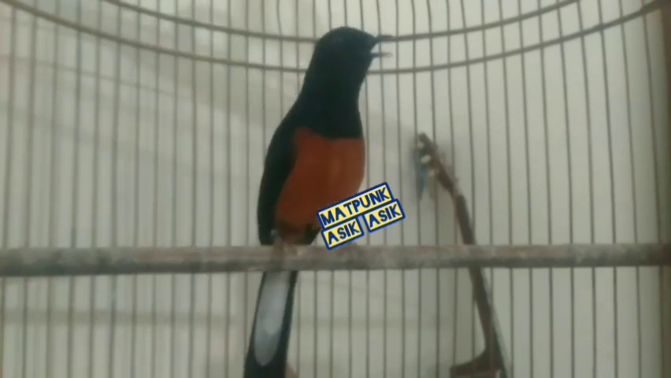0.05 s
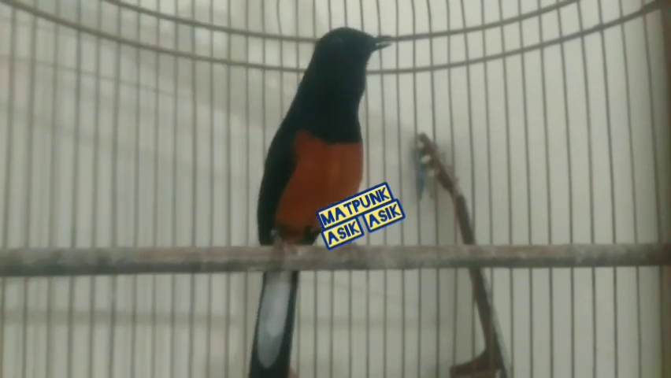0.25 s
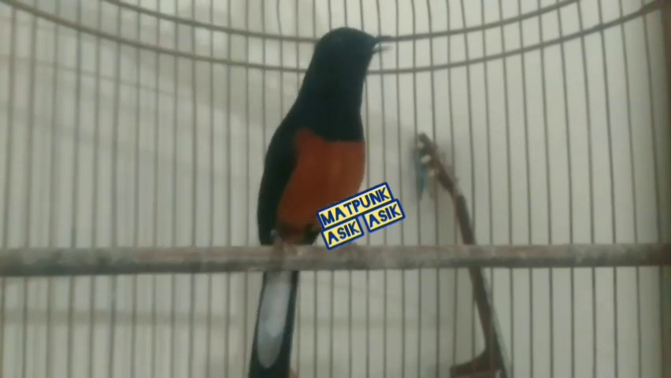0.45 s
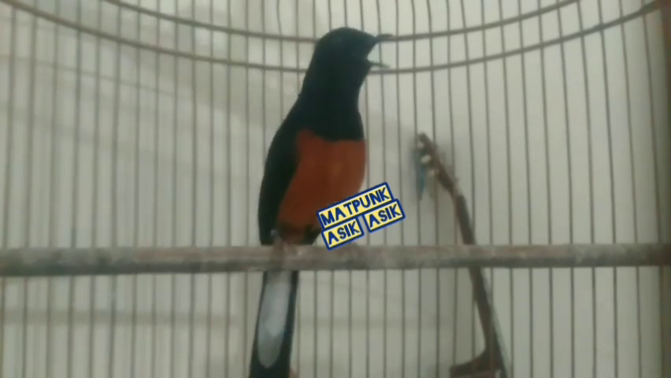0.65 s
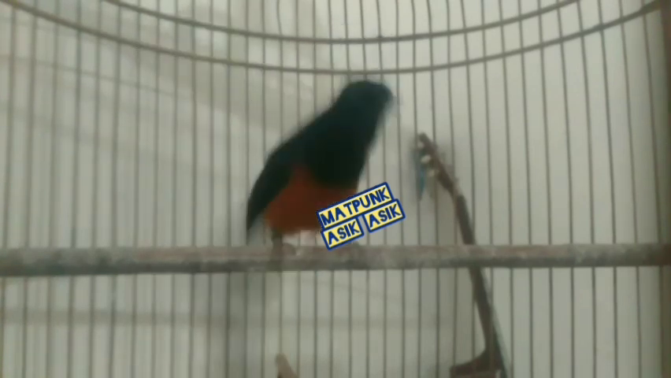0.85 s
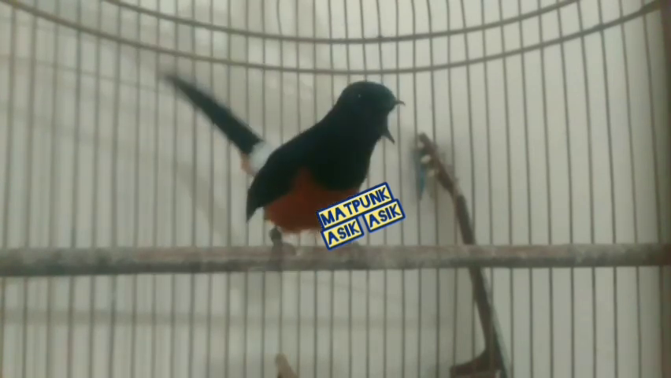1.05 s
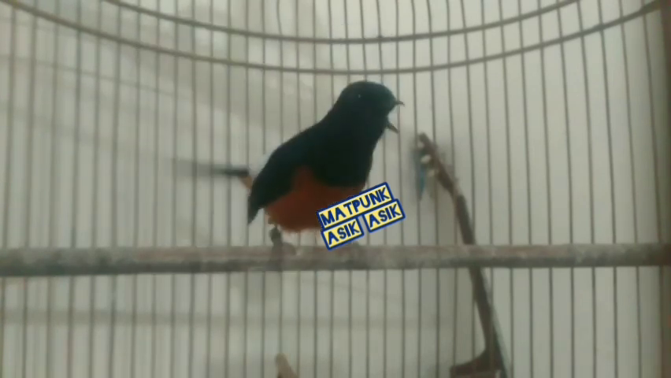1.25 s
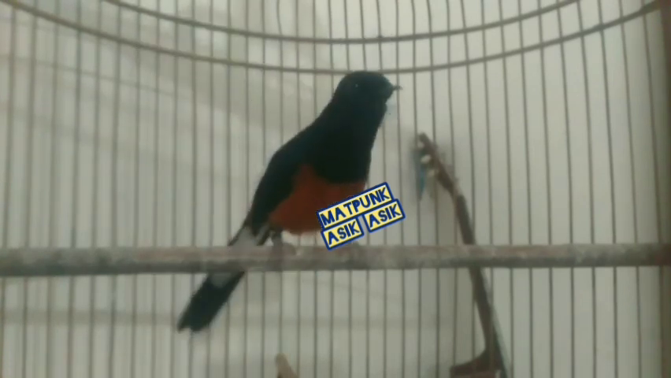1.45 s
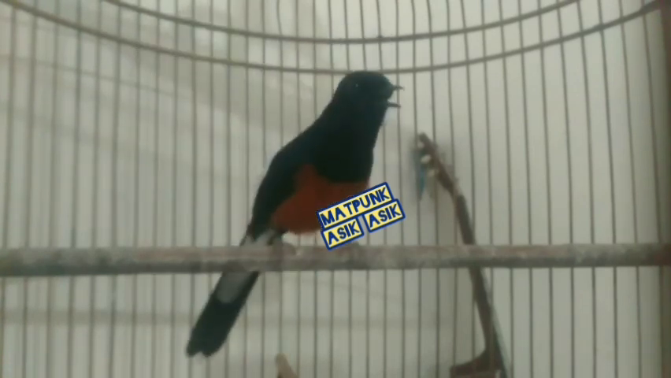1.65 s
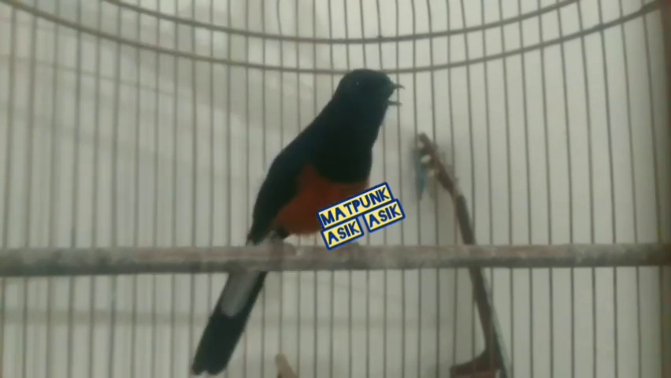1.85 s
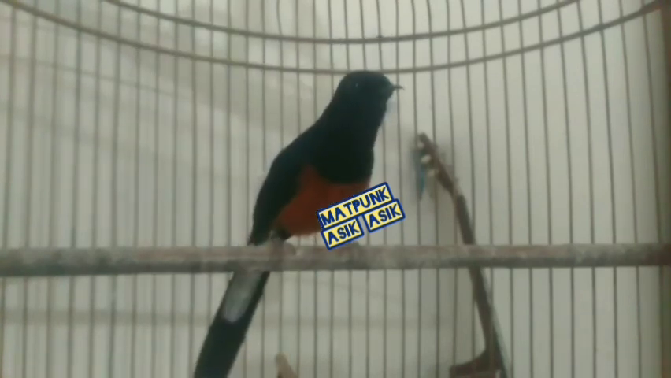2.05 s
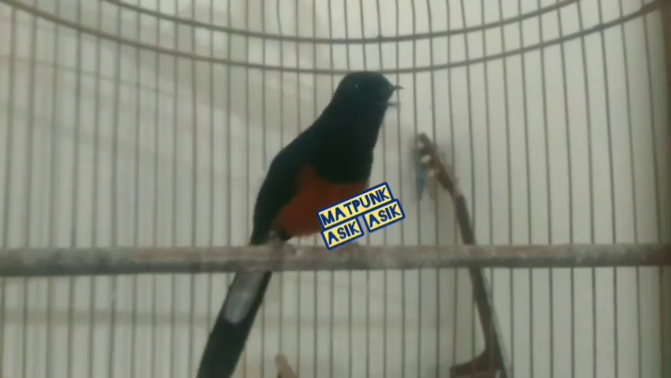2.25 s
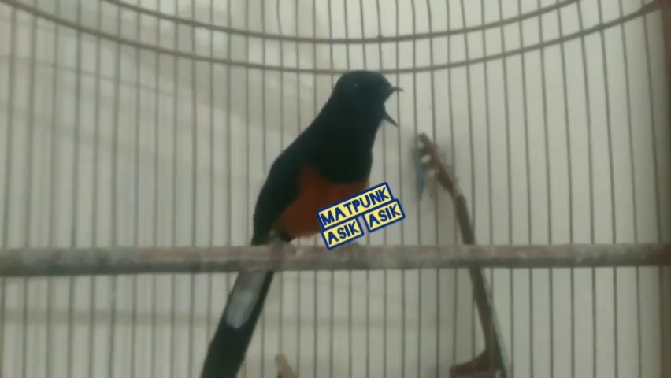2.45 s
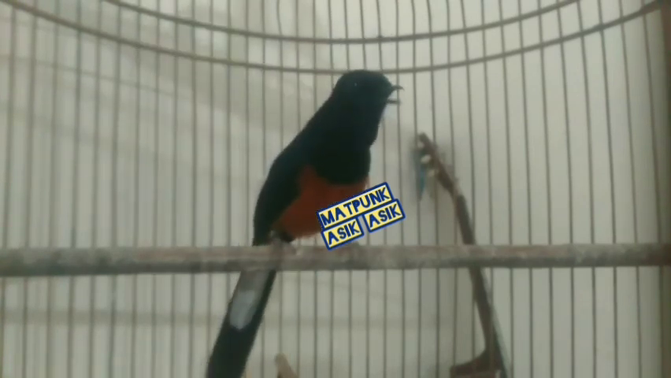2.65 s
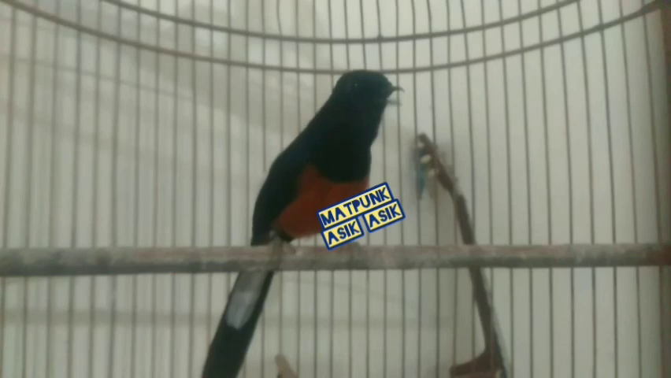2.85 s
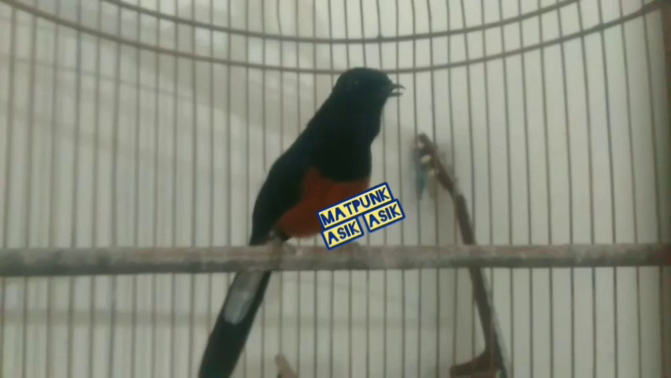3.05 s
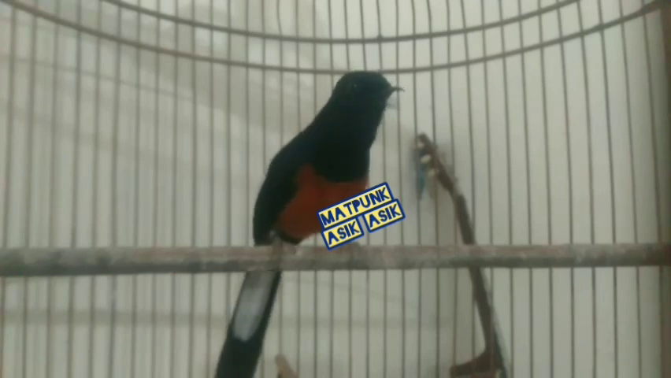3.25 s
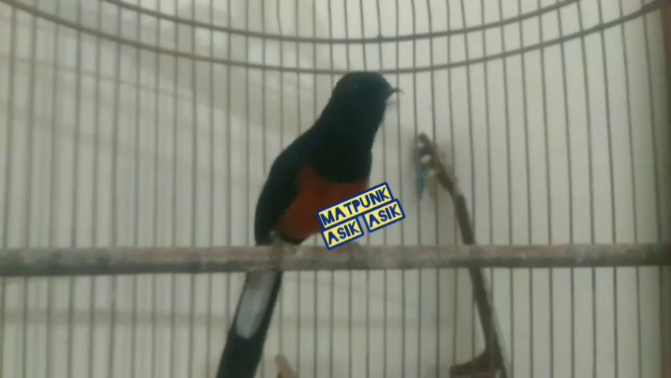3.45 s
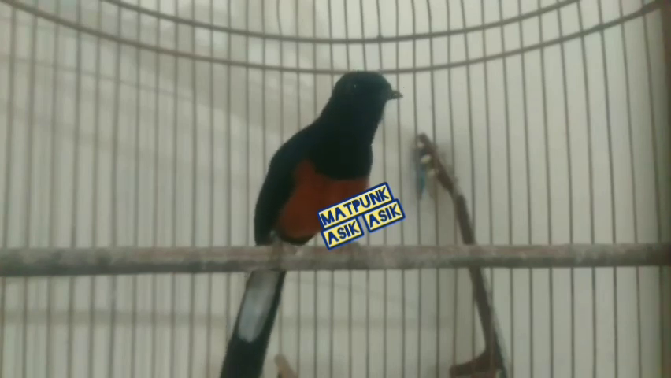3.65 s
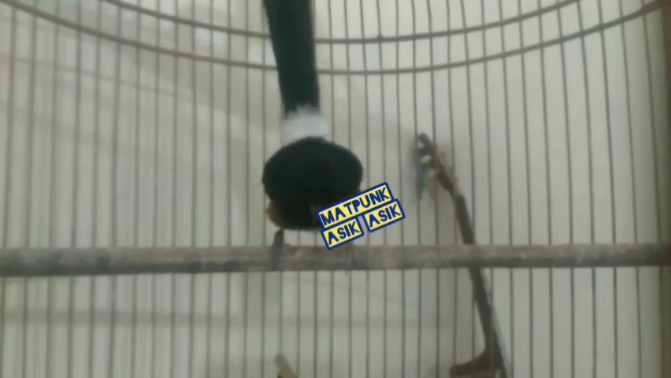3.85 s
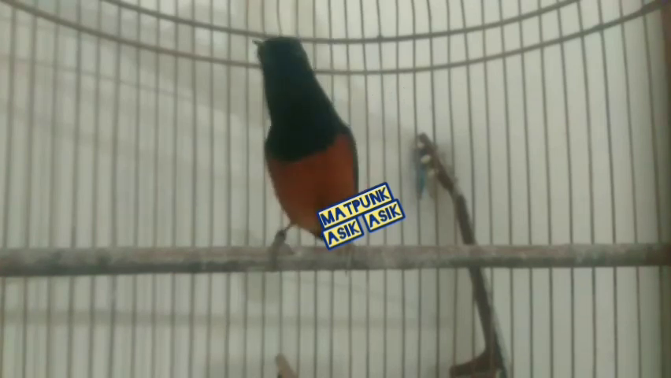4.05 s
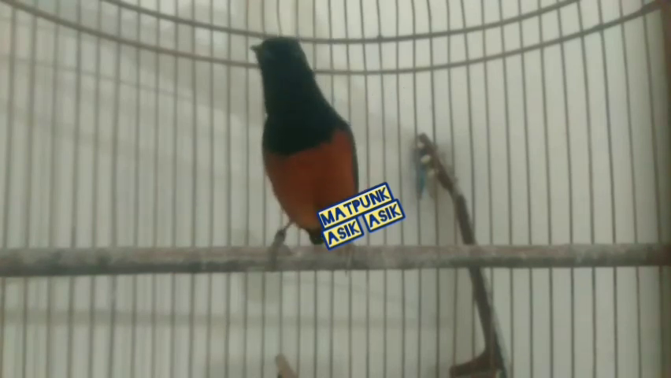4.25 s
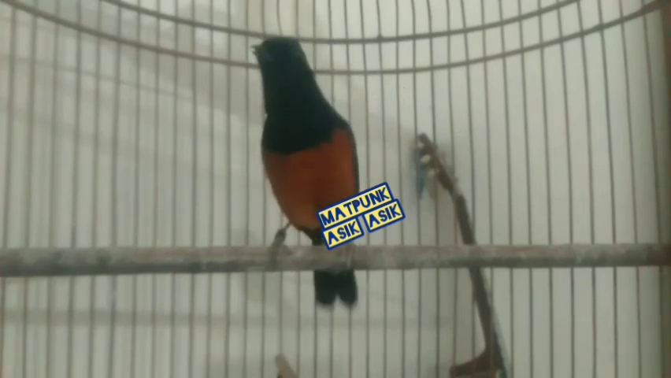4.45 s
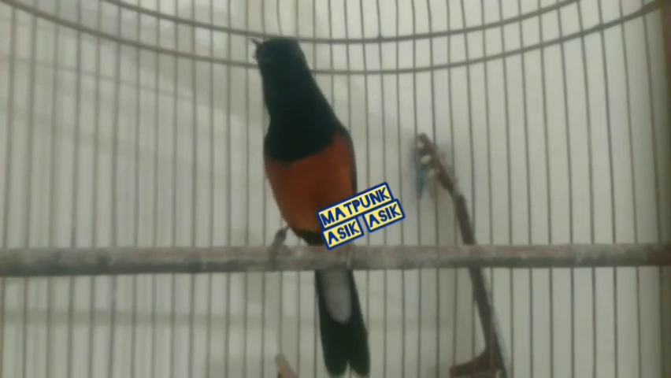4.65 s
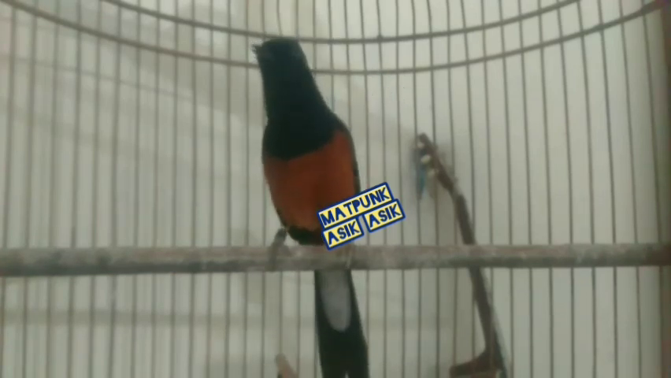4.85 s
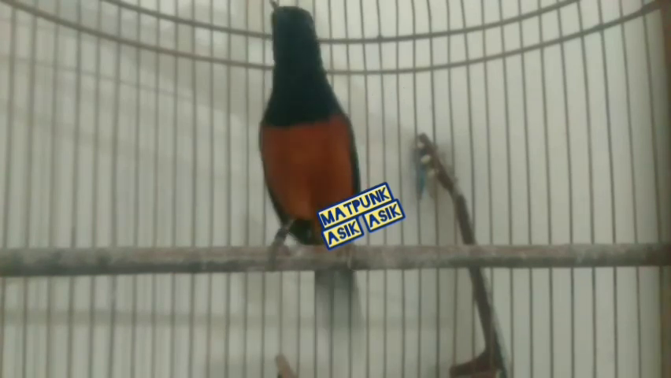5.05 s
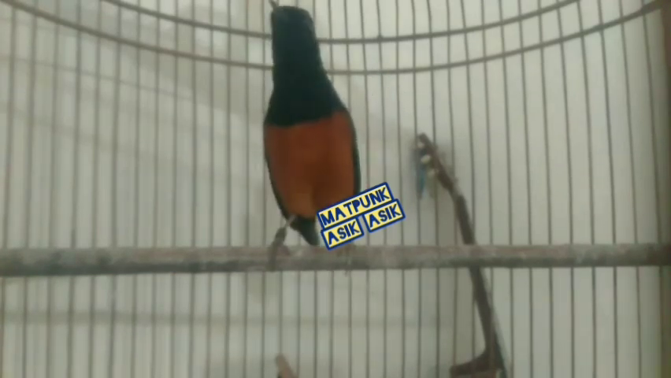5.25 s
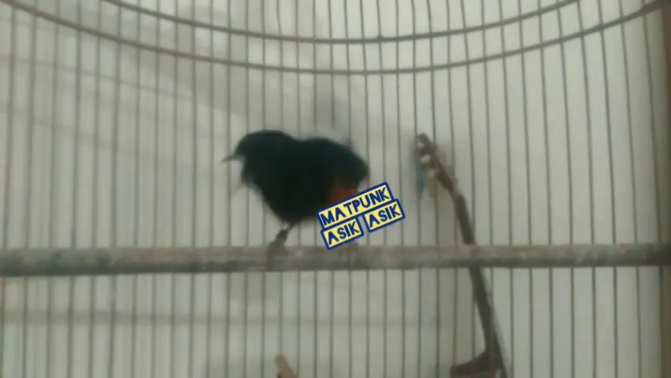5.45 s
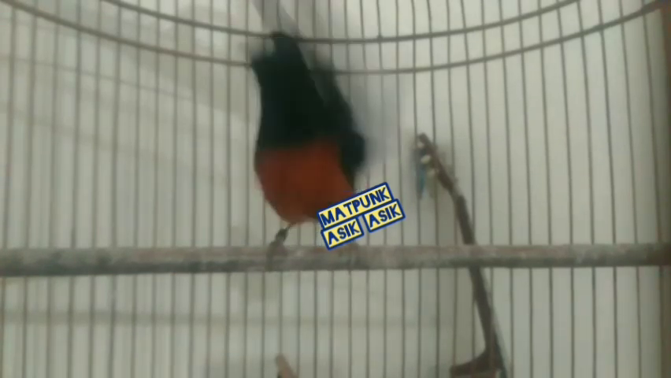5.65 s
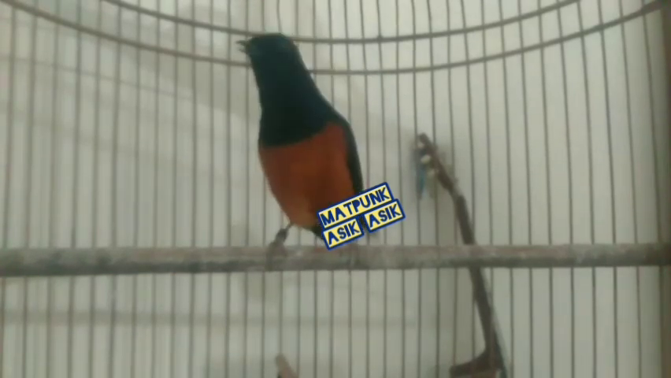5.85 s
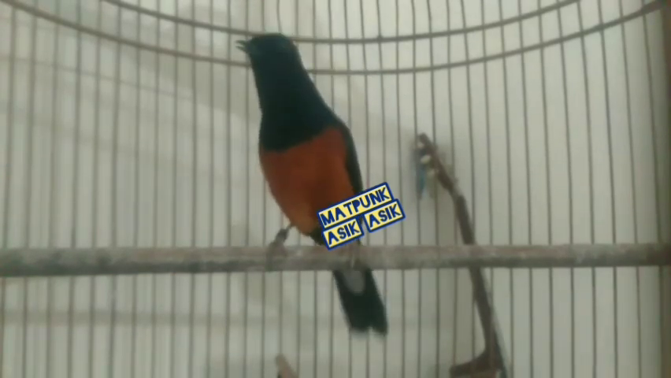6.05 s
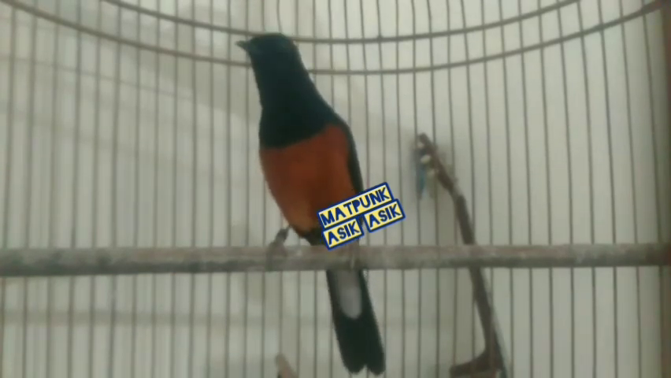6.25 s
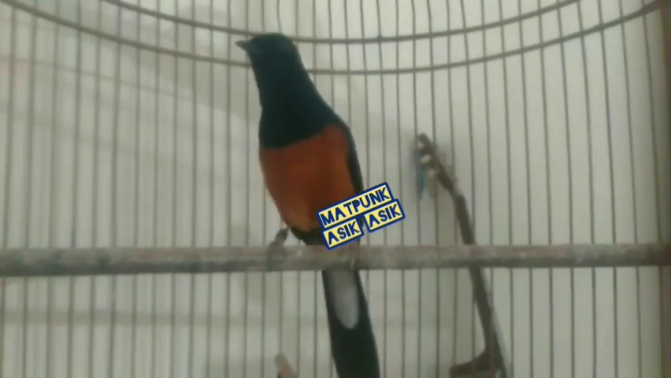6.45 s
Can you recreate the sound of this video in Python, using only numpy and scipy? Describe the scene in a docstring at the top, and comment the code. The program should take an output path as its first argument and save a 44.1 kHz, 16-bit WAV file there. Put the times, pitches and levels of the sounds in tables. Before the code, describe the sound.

A caged songbird sings close to the microphone in a small, hard, echoing room. From 0 to 0.75 s it gives quick clear whistles, one ending in a trembling warble. At about 0.8 and 1.3 s low notes creep up and break sharply higher, with whistles and buzzy warbles between. From 1.7 to 2.9 s come loud, rapid falling notes, many with shaken tails and tiny dull clicks. Around 3 to 3.45 s the notes are lower, hoarser and chattering. A pause follows, with soft wing flutters and a tap near 3.75 s. A brief run of calls comes at 4 s, then a rising, cracking call with a rough warble at 4.6 to 4.8 s. One sharp bill snap sounds at 5.5 s, followed by rustles and a mellow low whistle at 5.9 s. Distant birds whistle faintly over low, uneven outdoor rumble until about 6.6 s.

```python
"""A caged shama sings a fast run of whistles, sweeps and warbles close by in a small hard room.
It hops round on its perch, calls twice, snaps its bill and calls again; its voice is sine waves
with weak overtones, its movements are short bursts of coloured noise.
Other birds whistle faintly farther off, as thin wavering sines, over an outdoor rumble of low noise.
Echoes and a fading tail make the room; a limiter holds the loudest notes."""
import sys
import numpy as np
from scipy import signal
from scipy.fft import rfft, irfft
from scipy.io import wavfile
from scipy.ndimage import uniform_filter1d

SR = 44100
rng = np.random.default_rng(int(sys.argv[2]) if len(sys.argv) > 2 else 0)


def generate_wav(sig):
    """Save sig (samples, or channels by samples) to the path in sys.argv[1] as 16-bit PCM at SR."""
    pcm = np.round(np.clip(np.atleast_2d(sig).T, -1, 1) * 32767).astype(np.int16)
    wavfile.write(sys.argv[1], SR, pcm)


N = 287532
TIME = np.arange(N) / SR
EDGE_HZ = 15650  # the top of the sound: the final low-pass cuts here


def gain_of(db):
    """Turns decibels into a factor for the wave."""
    return 10 ** (np.asarray(db) / 20)


def evened(x):
    """Scales a signal to an rms (average strength) of 1."""
    return x / np.sqrt(np.mean(x ** 2) + 1e-20)


def read(points, hz):
    """Reads a table between its points, on a log-frequency axis as the ear hears pitch."""
    f, value = np.transpose(points)
    return np.interp(np.log(hz + 1), np.log(f + 1), value)


def add(mix, s, sound):
    """Mixes a sound in at time s, in seconds."""
    part = mix[max(round(s * SR), 0):][:len(sound)]
    part += sound[:len(part)]


def noise(colour):
    """Steady noise of rms 1: every frequency is present, as strongly as the colour table says."""
    spectrum = rfft(rng.standard_normal(N))
    hz = np.fft.rfftfreq(N, 1 / SR)
    return evened(irfft(spectrum * gain_of(read(colour, hz)), N))


def drift(rate_hz):
    """A random wander of rms 1: noise that keeps little above rate_hz."""
    spectrum = rfft(rng.standard_normal(N))
    hz = np.fft.rfftfreq(N, 1 / SR)
    return evened(irfft(spectrum / (1 + (hz / rate_hz) ** 4), N))


def burst(s, db, decay, rise):
    """A loudness curve that jumps up at time s and dies away; rise and decay in seconds."""
    age = np.maximum(TIME - s, 0)
    return gain_of(db) * (1 - np.exp(-age / rise)) * np.exp(-age / decay)


def span(s, length, edge=.011):
    """The times of a note, its progress from 0 to 1 and a gate that opens and shuts softly."""
    t = np.arange(max(s - edge / 2, 0), s + length + edge / 2, 1 / SR)
    nearest_end = np.minimum(t - t[0], t[-1] - t)
    gate = np.sin(np.pi / 2 * np.clip(nearest_end / edge, 0, 1)) ** 2
    return t, np.clip((t - s) / length, 0, 1), gate


# colours of the faint air, the deep rumble and the low drone: (f/Hz, relative level/dB)
AIR_COLOUR = [(100, -13), (250, -21.5), (400, -17), (700, -17.5), (1200, -16.5), (2400, -25), (3500, -32),
              (5000, -34), (8000, -35), (15000, -36)]
RUMBLE_COLOUR = [(12, -27.5), (22, 0.5), (50, -3.5), (80, 0.5), (100, -12.5), (130, -25.5), (200, -58)]
DRONE_COLOUR = [(70, -29), (115, -0.5), (200, 2), (260, -5.5), (330, -18), (500, -34.5), (900, -72)]
# the swells of the outdoor background, before random lumps: (t/s, rumble level/dB, drone level/dB)
OUTDOOR_LEVELS = [(0.0, -58.5, -69.5), (1.89, -61, -71.5), (3.0, -53.5, -61), (3.09, -51, -51),
                  (3.25, -56, -59), (3.65, -48, -51), (3.69, -53, -57), (3.94, -41.5, -59),
                  (4.03, -54.5, -67.5), (4.56, -57, -64.5), (4.87, -43, -54), (5.39, -55.5, -68),
                  (5.5, -45.5, -65), (5.97, -61, -69.5), (6.1, -45, -54.5), (6.52, -53.5, -58)]
AIR_DB = -64.5  # middle level of the air


def outdoors(rumble_db=0.0, drone_db=0, lumps_db=2, air_follow=0.13):
    """Low noise swells slowly and lumpily as rumble and drone; faint air swells a little with the drone."""
    s, *levels = np.transpose(OUTDOOR_LEVELS)
    deep, upper = (np.interp(TIME, s, db) + lumps_db * drift(rate_hz=2.2) for db in levels)
    rumble = gain_of(rumble_db + deep) * noise(RUMBLE_COLOUR)
    drone = gain_of(drone_db + upper) * noise(DRONE_COLOUR)
    air = gain_of(AIR_DB + air_follow * (upper - upper.mean())) * noise(AIR_COLOUR)
    return rumble + drone + air


# whistles of birds farther off: (start t/s, length t/s, first f/Hz, last f/Hz, relative peak level/dB)
FAR_WHISTLES = [ (-0.003, 0.08, 2046, 2110, -38.5), (0.319, 0.093, 2810, 2879, -40),
                (.75, .08, 2790, 2810, -33.5), (3.57, .14, 2725, 3300, -49.5),
                (3.818, 0.1, 2810, 2990, -51), (4.395, 0.038, 2365, 3074, -41.5),
                (4.432, 0.07, 2740, 3530, -53.5), (4.499, 0.11, 2046, 2062, -42.5),
                (5.18, 0.13, 1789, 1796, -49), (5.581, .1, 2177, 2050, -44),
                (5.685, 0.2, 1894, 1843, -44.5), (5.843, .055, 2626, 1930, -40.5),
                (6.161, 0.15, 2220, 2340, -43.5), (6.299, 0.31, 1935, 1988, -45)]
FAR_RISE_S, FAR_FADE_DB = 0.005, 18  # each far whistle rises, then fades by this much


def neighbours(level_db=-1, jitter=0.02):
    """Each far whistle is one thin sine gliding from pitch to pitch and wavering a little."""
    out, wobble = np.zeros(N), drift(rate_hz=16)
    for s, length, first_hz, last_hz, db in FAR_WHISTLES:
        t, u, gate = span(s, length)
        rise = np.minimum((t - t[0]) / FAR_RISE_S, 1)
        loudness = gate * rise * gain_of(db - FAR_FADE_DB * u)
        glide_hz = first_hz + (last_hz - first_hz) * u
        hz = glide_hz * (1 + jitter * np.interp(t, TIME, wobble))
        add(out, t[0], loudness * np.sin(2 * np.pi * np.cumsum(hz) / SR))
    return gain_of(level_db) * out


# wing beats and feet on the perch: (t/s, relative level/dB, rise t/s, decay t/s)
FLUTTERS = [(3.723, -41.5, 0.02, 0.021), (3.775, -29, 0.00061, 0.0068), (3.805, -34, 0.0043, 0.01),
            (3.893, -43, 0.0032, 0.017), (5.42, -49, 0.011, 0.036), (5.608, -39, 0.0035, 0.021),
            (5.738, -53, .008, 0.019), (6.275, -43, 0.011, 0.032)]
# colour of the flutter noise: (f/Hz, relative level/dB)
FLUTTER_COLOUR = [(200, -8.5), (320, -5.5), (500, 4), (800, -3.5), (1200, -13), (1800, -4), (3200, -20.5),
                  (4800, -37), (7000, -53), (15000, -37)]


def wings(grain_db=3):
    """Puffs of grainy, rustling noise from the feathers as the bird shifts and hops."""
    strokes = sum(burst(s, db, decay, rise) for s, db, rise, decay in FLUTTERS)
    grain = gain_of(grain_db * drift(rate_hz=170))
    return strokes * noise(FLUTTER_COLOUR) * grain


# colour of the bill snap: (f/Hz, relative level/dB)
SNAP_COLOUR = [(300, -43), (700, -1.5), (1000, -17), (1450, 5.5), (1900, -17), (2300, 2.5), (2900, -1),
               (3600, -9), (4500, -10), (5400, -8), (6500, -39), (8300, -26), (11000, -26.5),
               (15000, -22.5)]
SNAP_S, SNAP_DB, SNAP_DECAY_S = 5.4815, -20, 0.0046  # when the bill snaps shut, how hard, how briefly


def bill():
    """One sharp snap: a noise burst that starts almost at once and is gone within a blink."""
    return burst(SNAP_S, SNAP_DB, SNAP_DECAY_S, rise=.0001) * noise(SNAP_COLOUR)


# soft clicks that come with the notes: (t/s, relative level/dB)
CLICKS = [(.357, -39.5), (.475, -43.5), (.71, -38.5), (.868, -26), (.879, -25), (1.288, -37),
          (1.379, -32.5), (1.495, -43.5), (1.728, -33), (2.095, -39), (2.283, -37), (2.444, -32),
          (2.607, -38.5), (4.1, -29.5), (4.683, -32)]
# colour of the clicks: (f/Hz, relative level/dB)
CLICK_COLOUR = [(150, -17), (350, -7), (600, 1), (1000, -6), (2200, -3), (4000, -14.5), (7000, -23),
                (15000, -24)]
CLICK_DECAY_S = 0.00099


def clicks():
    """Short, dull ticks of noise that go with the song."""
    ticks = sum(burst(s, db, CLICK_DECAY_S, rise=0.0013) for s, db in CLICKS)
    return ticks * noise(CLICK_COLOUR)


# short hoarse notes: (start t/s, length t/s, first f/Hz, last f/Hz, relative level/dB,
# octave lift level/dB, pitch unsteadiness [share of the pitch])
RASPS = [ (3.094, 0.015, 1346, 1040, -18, 5, 0.081), (3.118, 0.033, 1002, 755, -20, 11, 0.058),
         (3.206, 0.049, 1553, 1370, -18.5, 21, 0.0033), (3.37, .035, 1326, 1032, -19, 4, 0.054),
         (4.028, 0.045, 969, 939, -19, 7, 0.033)]
RASP_FADE_DB, RASP_LIFT_DB = 15, 3.5  # fall in level over the note; lift of its overtones


def rasp(s, length, first_hz, last_hz, db, hoarse_db, unsteady):
    """A low, unsteady note with a strong octave, gliding and fading evenly."""
    t, u, gate = span(s, length)
    hz = first_hz + (last_hz - first_hz) * u
    return t, hz, gate * gain_of(db - RASP_FADE_DB * u), RASP_LIFT_DB, hoarse_db, unsteady


# shaken notes, mostly the endings of sweeps and whistles: (start t/s, length t/s, first f/Hz, last f/Hz,
# first relative level/dB, last relative level/dB, shake f/Hz, depth [share of the pitch],
# overtone lift level/dB, octave lift level/dB)
WARBLES = [ (0.215, 0.085, 1590, 1512, -11, -21, 42, 0.091, -7.5, -3),
           (0.886, 0.073, 1713, 1636, -17.5, -18.5, 54, 0.076, -3.5, -7),
           (1.014, 0.051, 2299, 2703, -13, -12, 80, 0.013, -3, 1.5),
           (1.065, .04, 2776, 2930, -16.5, -27, 94, 0.036, -8, 1),
           (1.528, 0.075, 2275, 2158, -8.5, -19.5, 82, 0.03, -2.5, -3),
           (1.742, .092, 1506, 1468, -17.5, -19.5, 39.5, 0.11, -3.5, 3.5),
           (1.949, 0.084, 1484, 1407, -22.5, -18, 46, 0.097, -2, 4.5),
           (2.142, 0.049, 2277, 2196, -13.5, -14.5, 101, 0.025, -3.5, -4),
           (2.32, 0.062, 1402, 1048, -14.5, -35.5, 46, 0.072, -4.5, -1),
           (2.683, 0.029, 1493, 1550, -21, -25.5, 69, 0.14, -9, -4),
           (3.414, .044, 2301, 2465, -18.5, -17.5, 105, 0.058, 6, 8.5),
           (4.692, 0.11, 1469, 1359, -16.5, -24, 44, 0.15, -2.5, 12.5)]
THROB = 2.2  # how strongly a warble swells at its crests
WARBLE_SCATTER = 0.00092  # pitch unsteadiness, as a share for each dB of octave lift


def warble(s, length, first_hz, last_hz, first_db, last_db, rate, depth, lift_db, hoarse_db):
    """A gliding note whose pitch shakes fast and swells at the crests; a hoarse one is also unsteady."""
    t, u, gate = span(s, length)
    shake = 1 + np.clip(depth, 0, .5) * np.sin(2 * np.pi * rate * (t - s))
    hz = (first_hz + (last_hz - first_hz) * u) * shake
    loudness = gate * gain_of(first_db + (last_db - first_db) * u) * shake ** THROB
    return t, hz, loudness, lift_db, hoarse_db, WARBLE_SCATTER * max(hoarse_db, 0)


# loud falling notes: (start t/s, length t/s, first f/Hz, last f/Hz, relative peak level/dB,
# overtone lift level/dB)
DOWNSWEEPS = [ (1.71, .031, 1991, 1565, -9, -4.5), (1.902, 0.044, 1883, 1542, -7, -4),
              (2.102, 0.038, 2592, 2241, -5.5, -3.5), (2.271, 0.044, 1772, 1579, -4, -8.5),
              (2.45, 0.1, 2360, 2113, -7.5, -4), (2.622, 0.055, 1850, 1478, -4, -6),
              (2.83, .048, 1440, 1244, -10, -7)]
ATTACK_S, ATTACK_DB, SAG_DB, FALL_POWER = .014, 13, 6.5, 1.2  # quick swell, then level and pitch sink


def downsweep(s, length, first_hz, last_hz, db, lift_db):
    """A quick swell at the start, while the pitch slides down and the level sags."""
    t, u, gate = span(s, length)
    under_db = ATTACK_DB * np.maximum(1 - (t - s) / ATTACK_S, 0) + SAG_DB * u ** 2
    hz = first_hz + (last_hz - first_hz) * u ** FALL_POWER
    return t, hz, gate * gain_of(db - under_db), lift_db, 0, 0


# low notes that creep up, break register and shoot upwards: (start t/s, length t/s, first f/Hz, last f/Hz,
# low register relative level/dB, high register relative level/dB, overtone lift level/dB,
# and after the break: octave lift level/dB, pitch unsteadiness [share of the pitch])
UPSWEEPS = [ (0.805, .075, 851, 1733, -16, -10.5, -3, -2, .007),
            (1.305, .089, 883, 1753, -14.5, -8, -4, -10, .006),
            (4.601, .09, 869, 1640, -13.5, -17, -2.5, 20.5, 0.059)]
CREEP, RUSH_POWER = .4, 4.9  # share of the climb made at an even pace; steepness of the rest
BREAK_AT, BREAK_WIDTH, BREAK_DIP_DB = 0.63, 0.046, 14.5  # place and width as shares of the note
LOW_SWELL_DB = 23  # the low register grows by this much


def upsweep(s, length, first_hz, last_hz, low_db, high_db, lift_db, hoarse_db, unsteady):
    """The pitch climbs ever faster; the voice dips at the register break and returns less steady."""
    t, u, gate = span(s, length)
    hz = first_hz + (last_hz - first_hz) * (CREEP * u + (1 - CREEP) * u ** RUSH_POWER)
    past = (u - BREAK_AT) / BREAK_WIDTH
    high = .5 + .5 * np.tanh(past)  # 0 in the low register, 1 in the high one
    swell_db = LOW_SWELL_DB * np.maximum(1 - u / BREAK_AT, 0) ** 3
    dip_db = BREAK_DIP_DB * np.exp(-past ** 2)
    db = low_db + (high_db - low_db) * high - swell_db - dip_db
    return t, hz, gate * gain_of(db), lift_db, hoarse_db * high, unsteady * high


# clean notes on one arc of pitch: (start t/s, length t/s, first f/Hz, middle f/Hz, last f/Hz,
# relative peak level/dB, place of the peak [0-1], overtone lift level/dB)
WHISTLES = [ (0, 0.074, 2605, 2966, 3134, -18.5, 0, -2.5), (.162, 0.058, 1566, 1618, 1646, -7.5, 1, -6.5),
            (0.364, 0.051, 2162, 2141, 2167, -7, 0.37, -15), (0.481, 0.12, 2370, 3023, 3074, -17, 0.09, 3),
            (0.641, .11, 2980, 3361, 3205, -21.5, 0, 5), (1.136, 0.089, 2677, 3073, 3374, -19, .35, 8),
            (1.395, 0.033, 1689, 1649, 1640, -15, 0.26, -4),
            (1.503, 0.027, 1814, 2327, 2580, -10.5, 0.91, 0.5),
            (2.475, 0.037, 2810, 2636, 2680, -29, 0.58, -3.5),
            (2.943, .053, 1338, 1396, 1321, -12.5, 0.8, -7), (3.053, .06, 1292, 1417, 1279, -17.5, 0.3, -5),
            (3.155, 0.041, 1303, 1581, 1690, -5, 0.73, -1.5),
            (3.302, .068, 1075, 1670, 1556, -10, .8, -0.5),
            (3.378, 0.047, 2004, 2080, 2510, -25.5, 0.95, -6),
            (3.95, .063, 1127, 1341, 1092, -21, 0.7, -3.5),
            (4.013, 0.019, 1400, 1450, 1500, -20, 0.3, -4.5),
            (4.058, 0.029, 1193, 1335, 1605, -14.5, 0.4, -4.5),
            (4.088, .036, 1694, 1944, 2299, -10.5, 0.13, -7.5),
            (5.899, 0.095, 1293, 1443, 1258, -14, 0.43, -9.5),
            (5.997, 0.033, 1257, 1062, 977, -27, 0.19, 3)]
SWELL_DB, FADE_DB = 15, 9.5  # about how far under its peak a whistle starts and ends


def arc(s, length, first_hz, middle_hz, last_hz, db, peak_at, lift_db, roundness=1.7):
    """A whistle: the pitch bends through three values while the level swells and fades."""
    t, u, gate = span(s, length)
    bend_hz = (2 * middle_hz - first_hz - last_hz) * 2 * u * (1 - u)
    hz = first_hz + (last_hz - first_hz) * u + bend_hz
    peak = np.clip(peak_at, .05, .95)
    before_db = SWELL_DB * np.maximum(1 - u / peak, 0) ** roundness
    after_db = FADE_DB * np.maximum((u - peak) / (1 - peak), 0) ** roundness
    return t, hz, gate * gain_of(db - before_db - after_db), lift_db, 0, 0


def song():
    """Every note as (times, pitch, loudness, overtone lift, octave lift, unsteadiness)."""
    kinds = (arc, WHISTLES), (upsweep, UPSWEEPS), (downsweep, DOWNSWEEPS), (warble, WARBLES), (rasp, RASPS)
    return [shape(*row) for shape, table in kinds for row in table]


# strength of the overtones that leave the bill, before lifts and slope: (f/Hz, level/dB)
OVERTONES = [(1700, -14), (2500, -31.5), (3200, -53), (3700, -47.5), (4500, -44.5), (5500, -57),
             (6500, -60), (7300, -63.5), (8400, -45), (9700, -53.5), (11400, -47), (13300, -50.5),
             (15300, -39)]
# colour of the noise of a cracking voice: (f/Hz, relative level/dB)
GRIT_COLOUR = [(200, -9), (500, -3), (1500, 2), (3000, 4.5), (5000, -7), (6500, -18.5), (9000, -11.5),
               (15000, -15.5)]


def shama(jitter=0.0033, shimmer_db=2.07, flicker_db=4, slope_db=-4, brightening=0.035,
          octave_share=0.15, grit_db=-4.0):
    """The voice organ gives a near sine and weak, flickering overtones; unsteady notes add noisy grit."""
    whistle, sheen = np.zeros(N), np.zeros(N)  # whistle: pitch and octave; sheen: the rest and grit
    chance = drift(rate_hz=300), drift(rate_hz=20), noise(GRIT_COLOUR)
    flickers = [drift(rate_hz=43) for _ in range(3, 13)]
    for t, hz, loudness, pressure_db, hoarse_db, unsteady in song():
        wobble, shimmer, grit = (c[round(t[0] * SR):][:len(t)] for c in chance)
        hz = hz * (1 + (jitter + unsteady) * wobble)
        phase = 2 * np.pi * np.cumsum(hz) / SR
        size = np.sqrt(2) * loudness * gain_of(shimmer_db * shimmer)
        push = (2 * loudness) ** brightening  # louder notes are a little brighter
        octave_db = read(OVERTONES, 2 * hz) - slope_db + octave_share * pressure_db + hoarse_db
        octave = push * gain_of(octave_db) * np.sin(2 * phase)
        add(whistle, t[0], size * (np.sin(phase) + octave))
        add(sheen, t[0], loudness * unsteady * gain_of(grit_db) * grit)
        for k, flicker in enumerate(flickers, 3):  # overtones at 3 to 12 times the pitch
            steady_db = read(OVERTONES, k * hz) + slope_db * (np.log2(k) - 2) + pressure_db
            db = steady_db + flicker_db * np.interp(t, TIME, flicker)
            below_edge = k * hz < EDGE_HZ
            add(sheen, t[0], size * push * gain_of(db) * below_edge * np.sin(k * phase))
    return whistle, sheen


# echoes off nearby walls: (delay t/s, gain [factor])
ECHOES = [(.0042, 0.072), (.0095, 0.12), (0.015, 0.29), (0.0182, 0.32), (0.032, 0.068), (0.044, 0.25)]


def walls(x):
    """Single early echoes: delayed, weaker copies from the nearest surfaces."""
    out = np.zeros(N)
    for delay, gain in ECHOES:
        add(out, delay, gain * x)
    return out


# how long the room takes to fade by 60 dB: (f/Hz, fade t/s)
ROOM_T60 = [(200, 0.41), (1000, 0.46), (2000, 0.45), (3200, .45), (3900, 0.88), (5300, 0.13), (5900, 0.12),
            (8500, 0.087), (15000, 0.15)]


def room(x, gap=0.0061, build=0.0014):
    """A blurred tail of random tiny echoes that builds up and dies at its own speed in each band."""
    impulses = rng.choice([-1., 1.], SR) * (rng.random(SR) < .08)
    hz, t, z = signal.stft(impulses, SR, nperseg=256)
    fade = gain_of(-60 * t / read(ROOM_T60, hz)[:, None])
    tail = signal.istft(z * fade, SR, nperseg=256)[1][:SR]
    tail = tail * (1 - np.exp(-np.maximum(TIME[:SR] - gap, 0) / build))
    song_band = abs(rfft(tail))[1000:3000]  # the tail lasts 1 s, so each step is 1 Hz
    return signal.fftconvolve(x, tail / np.sqrt(np.mean(song_band ** 2)))[:N]


def scene(room_db=-10, far_direct_db=-11, sheen_direct_db=1.5, sheen_room_db=-5, moves_room_db=-10.0):
    """The whistle arrives directly and off the walls; its sheen beams partly past the mic into the room."""
    whistle, sheen = shama()
    moves = wings() + bill() + clicks()
    far = neighbours()
    direct = whistle + gain_of(sheen_direct_db) * sheen + moves + gain_of(far_direct_db) * far
    scattered = gain_of(room_db) * whistle + gain_of(sheen_room_db) * sheen
    scattered = scattered + gain_of(moves_room_db) * moves + far
    return (direct + walls(whistle + sheen) + room(scattered) + outdoors())[None]


def record(dry, recovery=300):
    """A limiter clamps almost at once and lets go steadily (dB a second); then the top is cut off."""
    ceiling = .7
    over_db = 20 * np.log10(np.maximum(abs(dry[0]) / ceiling, 1))
    held_db = np.maximum.accumulate(over_db + recovery * TIME) - recovery * TIME
    limited = dry / gain_of(uniform_filter1d(held_db, size=28))
    low_pass = signal.firwin(511, EDGE_HZ, window=("kaiser", 9), fs=SR)
    return signal.oaconvolve(limited, low_pass[None], "same")


dry = scene()
out = record(dry)
generate_wav(out)
```